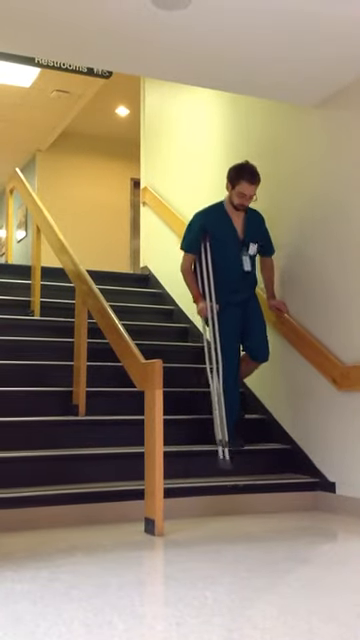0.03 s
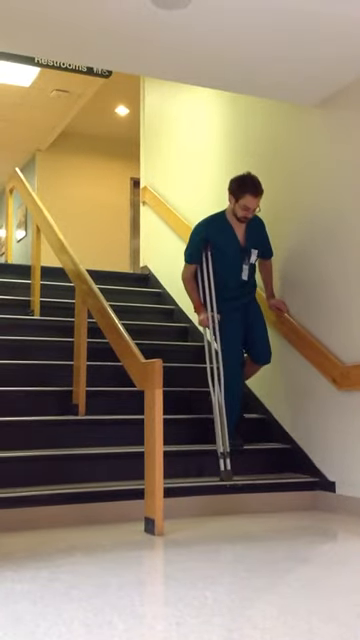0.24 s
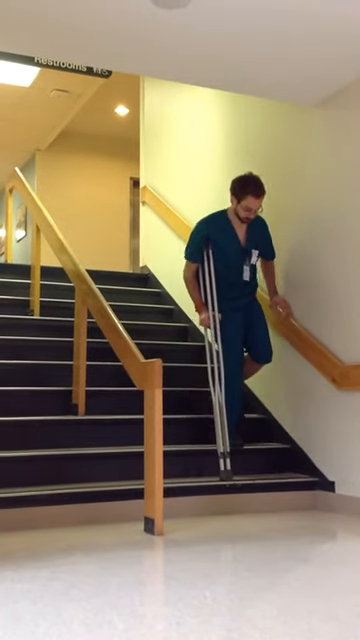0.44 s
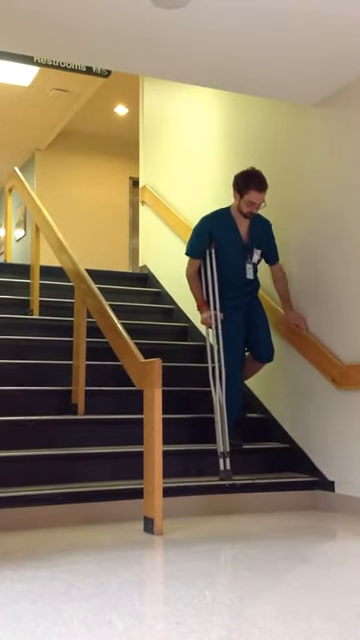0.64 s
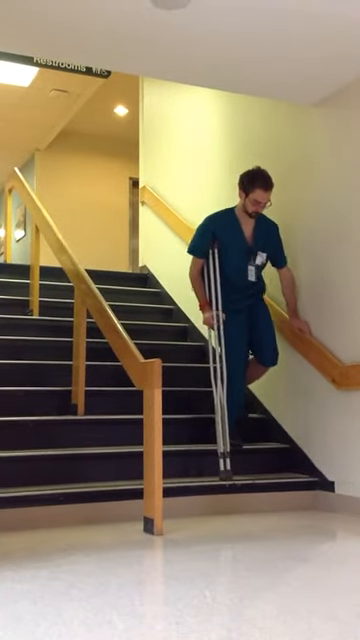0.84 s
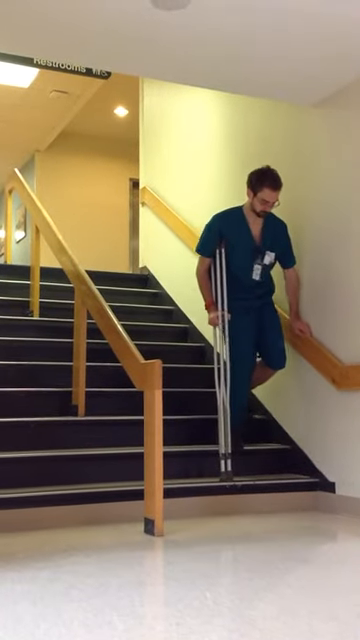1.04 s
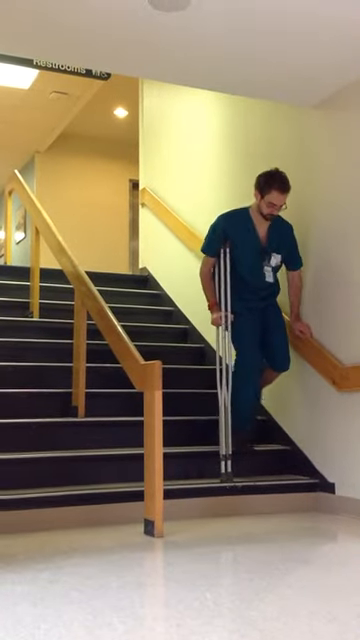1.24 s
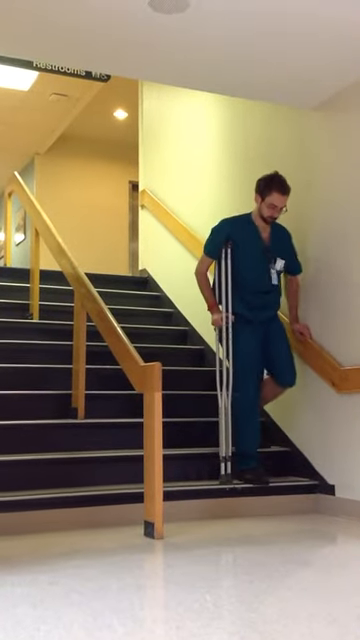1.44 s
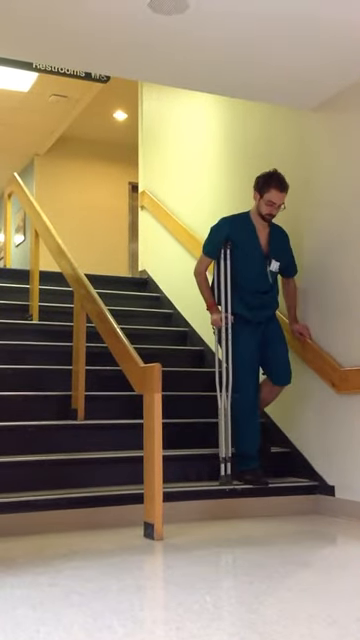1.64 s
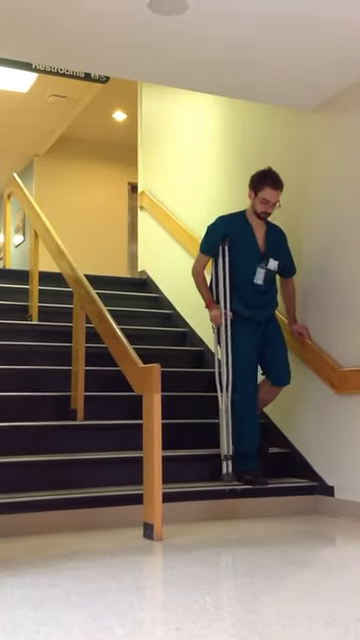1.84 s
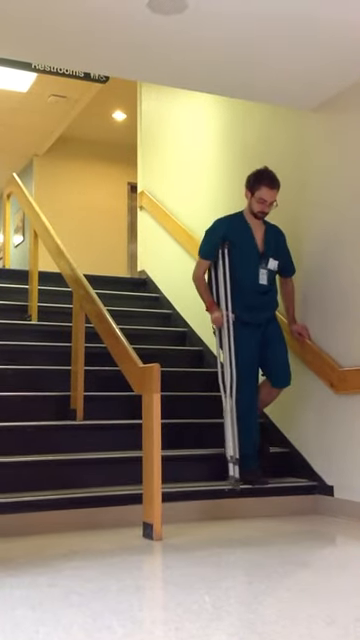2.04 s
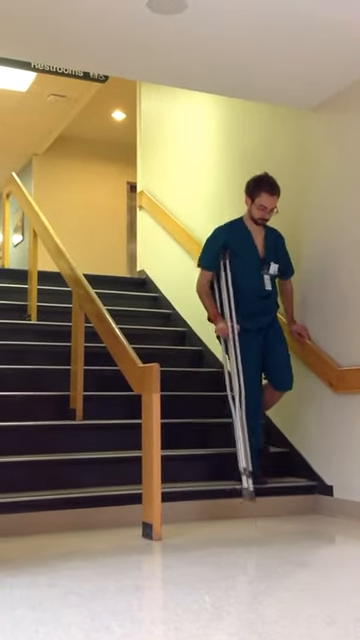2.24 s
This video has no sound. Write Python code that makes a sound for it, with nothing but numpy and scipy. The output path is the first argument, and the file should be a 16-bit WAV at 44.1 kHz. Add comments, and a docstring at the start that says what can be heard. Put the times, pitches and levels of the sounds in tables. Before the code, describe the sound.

An aluminium crutch is planted on a stair step at about 0.2 seconds with a sharp, briefly ringing clack that echoes through a hard-walled stairwell. After a faint scuff and a slight rustle of clothes around 1.2 seconds, a shoe lands with a soft thud at 1.4. The crutch ticks lightly near 1.8 seconds amid faint scuffs. Quiet ventilation drones throughout, heard from the foot of the stairs.

```python
"""A sharp metal clack comes first: an aluminium crutch is planted on a stair step, its tube rings
and its loose adjusting pin snaps home just after. A shoe follows with a soft thud, clothes rustle,
and the pin ticks as the weight comes off the crutch. One microphone stands at the foot of the stairs,
where the hard-walled stairwell answers every sound over the drone of the ventilation."""
import sys
import numpy as np
from scipy import signal
from scipy.fft import rfft, irfft, next_fast_len
from scipy.io import wavfile

SR = 44100
rng = np.random.default_rng(int(sys.argv[2]) if len(sys.argv) > 2 else 0)


def put_to_file(sound):
    """Save the sound as 16-bit audio at rate SR, in the file named by the first command-line argument."""
    columns = np.atleast_2d(sound).T  # one column per channel
    safe = np.clip(columns, -1, 1)
    whole_steps = np.round(safe * 32767)
    wavfile.write(sys.argv[1], SR, whole_steps.astype(np.int16))


N = 101429

# slack closing in the crutch's joints (time [s], level [dB], treble tilt [dB/octave])
JOINT_CLACKS = [(0.2273, 0.5, 0.5), (0.2289, 0.5, -0.5), (0.2361, -0.5, 8)]
# the clatter of each clack (frequency [Hz], relative density [dB])
CLATTER_SPECTRUM = [(40, -45), (300, -11), (750, -14.5), (1600, -7.5), (2050, -5), (2500, -8), (3100, -0.5),
                    (4000, -2), (4900, 0), (6000, 0), (7400, -2), (8600, -8), (11000, -7.5), (15000, -11)]
# the joints' ring (frequency [Hz], relative level [dB], t60 [s])
JOINT_MODES = [(2330, -2, .04), (2406, 0, .05), (2515, 0, .05), (2825, -3, .05), (4666, -7, .03),
               (4885, -6, .03), (5678, -2, .04), (6826, -5, .04), (7132, -5, .04)]
# the push through the rubber tip (frequency [Hz], relative density [dB])
PUSH_SPECTRUM = [(35, -53), (70, -28), (130, -7.5), (300, -12.5), (610, -13.5), (760, 0.5), (950, -2),
                 (1300, -5.5), (1750, -1.5), (2100, -15.5), (3500, -20), (8000, -35), (15000, -48.5)]
# the tube's bending modes (frequency [Hz], relative level [dB], t60 [s])
TUBE_MODES = [(749, -3, .13), (802, -1, .13), (964, -1, .11), (1022, -2, .11), (1112, -7, .1),
              (1158, -7, .1), (1570, -4, .08), (1621, -5, .08)]

def crutch():
    """The tip hits the step: the joints clack, then the cushioned push makes the tube ring."""
    clacks = np.zeros(N)
    for start, db, tilt in JOINT_CLACKS:
        clatter = burst(CLATTER_SPECTRUM, t60=0.028, tilt_db=tilt)
        joint_ring = amp(-10) * ring(JOINT_MODES, tilt)
        clacks += stairwell(at(start, amp(db) * (clatter + joint_ring)), wet_db=0)
    load_s = 0.2305  # the rubber tip compresses, so the load reaches the tube a moment later
    push = burst(PUSH_SPECTRUM, t60=0.052, rise_s=0.0055)
    tube = unit_energy(push + amp(-5) * ring(TUBE_MODES))
    return clacks + stairwell(at(load_s, amp(-2) * tube), wet_db=3.5)


# the pin knocks in its hole
# (time [s], level [dB], treble tilt [dB/octave], ring against snap [dB], snap t60 [s])
PIN_HITS = [(0.2424, 4.5, 9, -11, 0.039), (0.2433, -1.5, -2.5, -22.5, 0.0036), (1.738, -37, -6, 2, 0.035),
            (1.808, -30.5, -4.5, 5, 0.042)]
# the pin's snap (frequency [Hz], relative density [dB])
SNAP_SPECTRUM = [(300, -19), (2000, -1), (5000, -7), (7000, 2.5), (9500, -1), (11300, 0), (12500, -9.5),
                 (15000, -19.5)]
# the pin and its sleeve ringing (frequency [Hz], relative level [dB], t60 [s])
PIN_MODES = [(5560, -7, .02), (5760, 0, .025), (6000, -1, .018), (6140, -1, .022), (8300, -7, .02),
             (10600, -4, .02), (11110, -2, .02)]

def pin():
    """Metal on metal: under load the pin snaps brightly, unloaded it rings freely."""
    knocks = np.zeros(N)
    for start, db, tilt, ring_db, t60 in PIN_HITS:
        snap = burst(SNAP_SPECTRUM, t60, tilt)
        free_ring = amp(ring_db) * ring(PIN_MODES, tilt)
        knocks += stairwell(at(start, amp(db) * (snap + free_ring)), wet_db=-2.5)
    return knocks


# the sole's light, bright tap (frequency [Hz], relative density [dB])
TAP_SPECTRUM = [(500, -23.5), (2500, -26), (4000, 0.5), (5500, 6.5), (7500, -28), (15000, -30.5)]
# the shoe rolls on to the tread (time [s], level [dB])
SOLE_CONTACTS = [(1.390, -14), (1.416, -20.5), (1.459, -22), (1.566, -28.5)]
# the thud of each contact (frequency [Hz], relative density [dB])
THUD_SPECTRUM = [(35, -54), (70, -25), (110, -14.5), (150, -1.5), (260, -8), (400, 3.5), (520, 1), (640, 0),
                 (800, -11), (1300, -17), (2150, -25.5), (3200, -35), (7500, -38.5), (15000, -44.5)]

def shoe():
    """A soft sole lands with a thud and a light tap, then settles in a few quick contacts."""
    tap = amp(-34) * burst(TAP_SPECTRUM, t60=0.014)
    step = stairwell(at(1.3925, tap), wet_db=-14)
    for start, db in SOLE_CONTACTS:
        thud = amp(db) * burst(THUD_SPECTRUM, t60=0.033, rise_s=0.0032)
        step += stairwell(at(start, thud), wet_db=3.5)
    return step


# weight shifts on the step and the crutch (time [s], level [dB], treble tilt [dB/octave])
SCUFFS = [(1.215, -28, -7), (1.718, -35, 9), (1.93, -33.5, -2.5)]
# each scuff (frequency [Hz], relative density [dB])
SCUFF_SPECTRUM = [(50, -30), (170, 11.5), (400, 2), (1500, 1.5), (4000, -8), (7000, -19.5), (15000, -42)]

def weight_shifts():
    """Faint dull scuffs as the load moves between foot and crutch, more room than direct sound."""
    scuffs = sum(at(start, amp(db) * burst(SCUFF_SPECTRUM, t60=0.049, tilt_db=tilt))
                 for start, db, tilt in SCUFFS)
    return stairwell(scuffs, wet_db=5)


# cloth brushes (peak time [s], rise [s], fall [s], level [dB])
CLOTH_BRUSHES = [(0.798, 0.032, 0.031, -68), (1.215, 0.038, 0.047, -65), (1.42, 0.031, 0.16, -62.5)]
# the fabric's hiss (frequency [Hz], relative density [dB])
CLOTH_SPECTRUM = [(200, -24), (1500, 6), (4000, -1), (9000, -2.5), (15000, -4)]

def clothes():
    """Fabric hisses briefly with each move, dry enough to sound close to the microphone."""
    t = np.arange(N) / SR
    level = np.zeros(N)
    for peak, rise, fall, db in CLOTH_BRUSHES:
        width = np.where(t < peak, rise, fall)
        level += amp(db) * np.exp(-((t - peak) / width) ** 2 / 2)
    return stairwell(level * steady_noise(CLOTH_SPECTRUM), wet_db=-8)


# reverberation between the hard walls (frequency [Hz], t60 [s])
STAIRWELL_DECAY = [(100, 1.2), (500, 1.68), (1000, 1.69), (1700, 1.28), (3500, 1.094), (6000, 0.77),
                   (10000, 0.44), (15000, 0.36)]

def stairwell(direct, wet_db):
    """The direct sound reaches the microphone, then a diffuse tail whose treble dies first."""
    hz, t, bands = signal.stft(rng.standard_normal(N), SR, nperseg=256)
    decay = np.exp(-np.log(1000) * t / along(STAIRWELL_DECAY, hz)[:, None])
    tail = signal.istft(bands * decay, SR, nperseg=256)[1][:N]
    wall_delay_s, build_s = 0.004, 0.0013
    build_up = 1 - np.exp(-np.arange(N) / SR / build_s)
    response = unit_energy(at(wall_delay_s, tail * build_up))
    return direct + amp(wet_db) * signal.fftconvolve(direct, response)[:N]


# moving air in the stairwell (frequency [Hz], relative density [dB])
AIR_SPECTRUM = [(25, -62), (50, -31), (80, -14), (125, -2.5), (175, -5.5), (225, 4.5), (290, -2.5),
                (380, -1.5), (550, -3.5), (900, -10.5), (1700, -19.5), (2500, -21.5), (5000, -23.5),
                (10000, -27), (15000, -30.5)]

def ventilation():
    """The room tone: steady air noise with one narrow duct resonance."""
    duct_hz = 172
    b, a = signal.iirpeak(duct_hz, Q=duct_hz / 24, fs=SR)
    drone = signal.filtfilt(b, a, rng.standard_normal(N + SR))[SR // 2:][:N]
    return amp(-58) * steady_noise(AIR_SPECTRUM) + amp(-61.5) * unit_rms(drone)


# background midrange noise (frequency [Hz], relative density [dB])
WASH_SPECTRUM = [(100, -35), (400, -2.5), (900, 0.5), (1750, -2), (2150, -10), (6000, -20.5), (15000, -32)]

def wash():
    """A faint midrange wash behind everything slowly fades."""
    return amp(-62) * fade(t60=15.7) * steady_noise(WASH_SPECTRUM)


def burst(spectrum, t60, tilt_db=0, rise_s=0):
    """The short noisy push of one contact; a soft one swells over rise_s."""
    swell = 1 - np.exp(-np.arange(1, N + 1) / (1 + SR * rise_s))
    contact = rng.standard_normal(N) * swell * fade(t60)
    return unit_energy(colour(contact, spectrum, tilt_db))


def ring(modes, tilt_db=0):
    """Damped modes that build up over one cycle; level and tilt set each one's share of the energy."""
    t = np.arange(N) / SR
    ringing = np.zeros(N)
    for hz, db, t60 in modes:
        mode = np.sin(2 * np.pi * hz * t) * (1 - np.exp(-hz * t)) * fade(t60)
        ringing += amp(db + tilt_db * np.log2(hz)) * rng.choice([-1, 1]) * unit_energy(mode)
    return unit_energy(ringing)


def steady_noise(spectrum):
    """Coloured noise at rms 1."""
    return unit_rms(colour(rng.standard_normal(N), spectrum))


def colour(x, spectrum, tilt_db=0, corner_hz=700):
    """Causal filter with the given spectrum, tilted by tilt_db an octave above the corner."""
    size = 2 * next_fast_len(N)
    hz = np.fft.rfftfreq(size, 1 / SR)
    gain = amp(along(spectrum, hz) + tilt_db * np.log2(1 + hz / corner_hz))
    cepstrum = irfft(np.log(gain))
    cepstrum[1:size // 2] *= 2  # minimum phase: nothing sounds before the hit
    cepstrum[size // 2 + 1:] = 0
    return irfft(rfft(x, size) * np.exp(rfft(cepstrum)), size)[:N]


def along(points, hz):
    """(Hz, value) points read on a log axis."""
    freqs, values = np.transpose(points)
    return np.interp(np.log(hz + 1), np.log(freqs + 1), values)


def fade(t60):
    """A decay of 60 dB in t60 seconds."""
    return np.exp(-np.log(1000) * np.arange(N) / SR / t60)


def at(start, x):
    """x delayed by start seconds."""
    return np.pad(x, (round(start * SR), 0))[:N]


def amp(db):
    """Decibels to gain."""
    return 10 ** (np.asarray(db) / 20)


def unit_rms(x):
    """Scaled to rms 1."""
    return x / np.sqrt(np.mean(x ** 2) + 1e-20)


def unit_energy(x):
    """Scaled to energy 1."""
    return x / np.linalg.norm(x)


def scene():
    """Everything in mono, from the microphone at the foot of the stairs."""
    return (crutch() + pin() + shoe() + weight_shifts() + clothes() + ventilation() + wash())[None]


def record(dry):
    """The recorder cuts off steeply above 15.5 kHz."""
    return signal.sosfilt(signal.ellip(12, .1, 90, 15500, fs=SR, output="sos"), dry)


dry = scene()
out = record(dry)
put_to_file(out)
```